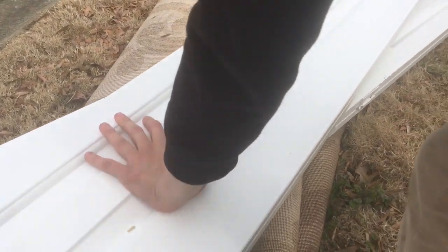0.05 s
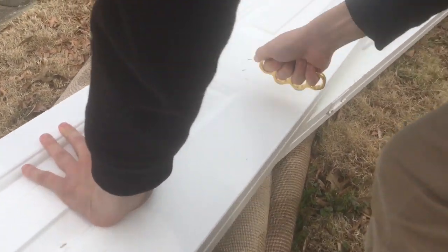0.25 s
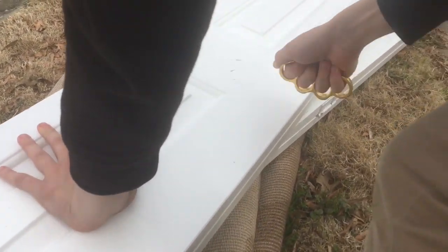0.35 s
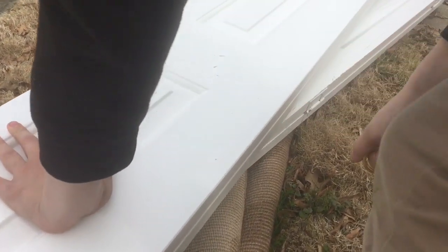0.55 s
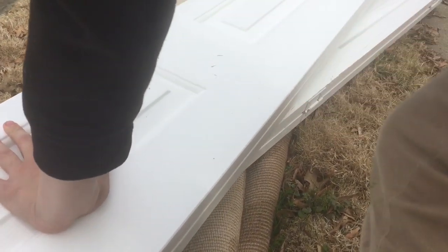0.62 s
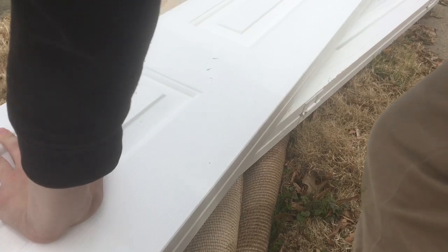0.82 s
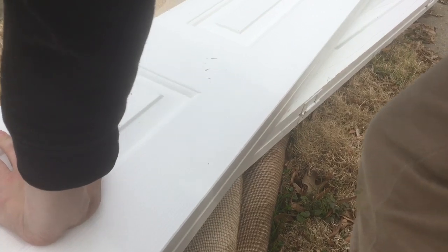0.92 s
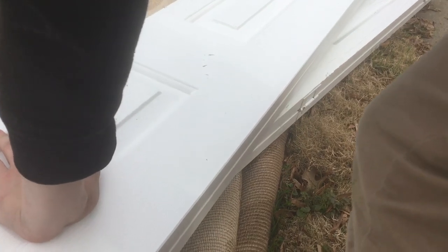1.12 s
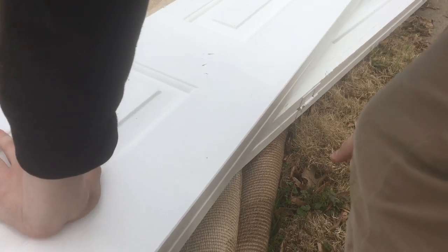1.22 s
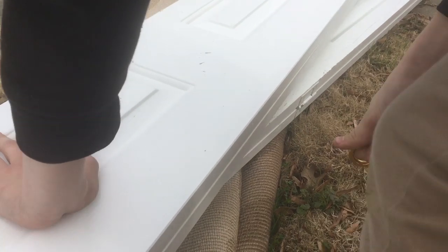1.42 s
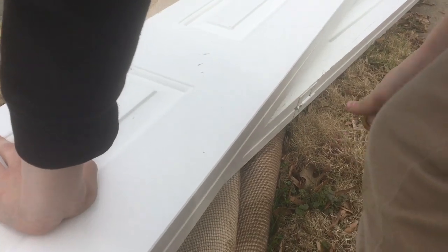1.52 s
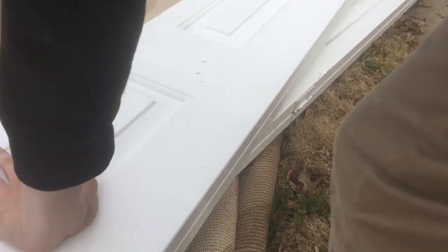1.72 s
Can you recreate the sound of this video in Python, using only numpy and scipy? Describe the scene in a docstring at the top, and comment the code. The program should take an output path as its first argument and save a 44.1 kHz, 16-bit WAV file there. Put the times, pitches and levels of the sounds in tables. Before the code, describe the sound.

A fist in metal knuckles whacks a wooden door outdoors, followed by faint knocks.

```python
"""Metal knuckles on a wooden door

Outdoors, a sleeve swishes and a fist in metal knuckles whacks a door lying on other doors.
The metal cracks on the panel; the door booms, chatters on the stack and overloads the microphone.
Later come a few light knocks and a short squeak of sliding metal, over a quiet yard with a distant hum."""
import sys
import numpy as np
from scipy import signal
from scipy.fft import rfft, irfft
from scipy.io import wavfile
from scipy.ndimage import uniform_filter1d

SR = 44100
rng = np.random.default_rng(int(sys.argv[2]) if len(sys.argv) > 2 else 0)


def to_wav(s):
    """Save 16-bit WAV."""
    ch = np.atleast_2d(s).T  # columns
    pcm = np.round(np.clip(ch, -1, 1) * 32767)  # PCM
    wavfile.write(sys.argv[1], SR, pcm.astype(np.int16))


N = 77175
TIME = np.arange(N) / SR

# contacts on the door: t/s, level/dB, dull above f/Hz, thin below f/Hz, ring time factor,
# boom of the struck spot f/Hz, boom boost/dB
BLOWS = [(0.2295, -10, 9200, 69, 0.76, 300, -0.5), (0.2391, -9.5, 3000, 132, .75, 487, 3.5),
         (0.2564, -24.5, 2464, 197.8, .55, 302.3, 2), (0.2765, -17.5, 3500, 878, 0.49, 600, 4.5),
         (0.2873, -27.5, 3500, 500, 0.54, 600, -7), (0.364, -41, 5100, 914, 0.43, 910, 6),
         (0.388, -51.5, 8690, 900, 0.38, 300, 5), (1.339, -47, 1280, 400, .45, 560, 13.5),
         (1.529, -28, 2220, 168, 0.59, 629, 11), (1.5559, -39, 7000, 1210, .6, 614, 4),
         (1.582, -39.5, 890, 250, 0.75, 340, 7.5), (1.634, -51, 714, 300, .7, 450, 7),
         (1.7, -48, 598, 366, 0.42, 399, 4), (1.7087, -28, 2120, 542, 0.29, 590, 12),
         (1.7256, -42.5, 800, 150, 0.8, 564, 4)]
# the door's strong modes: f/Hz, relative level/dB, t60/s before a blow's ring time factor
DOOR_MODES = [(76, -12, .3), (128, -16, .2), (151, -13, .22), (181, -3, .24), (219, -2, .2), (275, 0, .18),
              (308, -4, .17), (355, -3, .18), (388, -5, .16), (479, -2, .16), (507, -2, .17),
              (555, -8, .16), (630, -12, .2), (659, -8, .18), (763, -10, .17), (999, -11, .17),
              (1055, -9, .18), (1228, -7, .16), (1286, -10, .17), (1400, -11, .14), (1803, -8, .15),
              (2379, -13, .16)]
# its dense weak modes: f/Hz, level/dB at a spacing of MODE_GAP_HZ, t60/s before that factor
WOOD_GRAIN = [(45, -11.5, 0.13), (150, -9, .25), (300, -7.5, .2), (550, -16, 0.22), (850, -19, 0.19),
              (1200, -19, .17), (2160, -26, 0.12), (3500, -30.5, .16), (6500, -42, .17), (14700, -36, .16)]
DOOR_MODES_DB, MODE_GAP_HZ, BOOM_WIDTH_HZ = -5.5, 21, 100
# soft thuds of the hand and heaves of the stack: t/s, level/dB, f/Hz, t60/s
THUMPS = [(0.2325, -2, 190, 0.041), (0.242, -22, 76, .15), (0.27, -22, 66, .16), (0.528, -38, 228, .14),
          (1.336, -36, 420, .06), (1.535, -23, 133.3, .07), (1.553, -26.5, 60, 0.16),
          (1.584, -30, 330, .07), (1.712, -31, 225, .07)]
THUMP_RISE_S, BUILD_CYCLES = .0035, .66

# metal biting the wood: t/s, level/dB, t60/s, tilt/(dB per octave)
CRACKS = [(0.2293, -8, 0.013, 0.5), (0.2305, -12, 0.0088, 3), (0.2322, -16.5, 0.011, -2),
          (0.2505, -22.5, 0.023, 2), (0.2768, -20.5, .01, -7.5), (0.2885, -37, .01, 1.5),
          (1.5295, -35, 0.01, -7), (1.5555, -42, .02, -6), (1.709, -40, .025, -12)]
# tone of a crack before its tilt: f/Hz, relative level/dB
CRACK_COLOUR = [(200, -12.5), (1000, 1), (2500, 8.5), (4200, -4), (6000, 2.5), (8000, -8.5), (10500, -9),
                (12500, -4), (16000, -4.5)]
# pings of the knuckles: t/s, level/dB
PINGS = [(0.2385, -50), (0.251, -50)]
# modes of the knuckles: f/Hz, relative level/dB, t60/s
METAL_MODES = [(5300, -7, .24), (6880, 6, .05), (9250, 9, .04), (10860, -4, .25), (13200, -8, .2)]
# partials of the squeak: f/Hz, relative level/dB, glide as a share of f
SQUEAK_PARTIALS = [(2085, -4, .04), (5230, 0, .025), (10880, -8, -.012)]
SQUEAK_START_S, SQUEAK_LENGTH_S, SQUEAK_DB = 1.534, .076, -52
# small dry ticks: t/s, level/dB, t60/s, tilt/(dB per octave)
TICKS = [(0.1095, -36.5, 0.013, 0), (0.1255, -57, 0.024, -3.5), (0.134, -41, 0.014, -10),
         (0.145, -42, .03, 4), (0.196, -39, .022, -0.5), (0.207, -32, .015, -4), (0.218, -43, 0.018, 4),
         (0.3275, -48, 0.012, -2.5), (0.3562, -50.5, 0.01, 0), (0.463, -56, .04, -7), (0.525, -55, .05, -9),
         (0.541, -38, 0.0081, -1.5), (0.609, -59, .04, -9), (1.1105, -40, 0.0068, 2.5),
         (1.331, -37, 0.01, 9), (1.416, -53.5, 0.022, -4), (1.6275, -47, 0.017, -1)]
# tone of a tick before its tilt: f/Hz, relative level/dB
TICK_COLOUR = [(500, -26.5), (2500, -11.5), (6000, -9.5), (9000, -10), (14000, -2), (16000, -3)]

# swish of the sleeve: t/s, level/dB
SLEEVE_FADER = [(0, -62), (.07, -59.5), (.125, -50.5), (.18, -51), (.215, -48), (.25, -59), (.35, -68.5),
                (.5, -66.5), (.8, -73.5), (1.05, -71), (1.28, -64), (1.4, -59.5), (1.46, -68), (1.61, -63),
                (1.75, -69)]
# tone of rubbing cloth: f/Hz, relative level/dB
SLEEVE_COLOUR = [(300, -5), (1500, -7), (4500, -10), (7000, -5), (10000, -3.5), (12500, -1), (16000, 0.5)]
GRAINS_PER_S, GRAIN_SPREAD_DB, GRAIN_SHARE = 2700, 5, .66
# shuffle of the body: t/s, level/dB
SHUFFLE_FADER = [(0, -56.5), (.1, -59), (.15, -52), (.175, -39.5), (.225, -36.5), (.3, -46.5), (.42, -58),
                 (.53, -54), (.66, -65.5), (1.25, -69), (1.41, -54), (1.47, -69.5), (1.75, -69.5)]
# its dull tone: f/Hz, relative level/dB
SHUFFLE_COLOUR = [(60, -3.5), (200, 4), (400, 0), (800, -9), (1500, -12.5), (2800, -18), (5000, -26.5),
                  (16000, -46)]

# tone of the echo tail: f/Hz, relative level/dB
ECHO_COLOUR = [(20, -45), (110, -28.5), (180, -6.5), (280, -3.5), (390, -3), (500, -22), (1300, -25),
               (2500, -10.5), (5000, -18), (15000, -29.5)]
ECHO_DB, ECHO_T60_S, ECHO_RISE_S = -35.5, .9, .08
# tone of the outdoor air: f/Hz, relative level/dB
AIR_COLOUR = [(25, -11.5), (55, -1.5), (90, -8), (170, -4), (280, -7), (450, -23), (700, -22), (1050, -20),
              (1700, -34), (2800, -39.5), (5000, -47), (16000, -43)]
# partials of the distant hum: f/Hz, level/dB before the yard fader
HUM_PARTIALS = [(119, -55.5), (238, -64), (359, -72.5)]
AIR_DB, HUM_WAVER_HZ = -52.5, 3.4
# ride on air and hum, dipping after the punch: t/s, gain/dB
YARD_FADER = [(0, -1), (.22, 1), (.36, -10.5), (.55, -6.5), (.8, -2), (1.3, 0.5), (1.75, 0.5)]
# rumble on the microphone: t/s, level/dB
RUMBLE_FADER = [(0, -36.5), (.06, -51.5), (.16, -46.5), (.3, -60.5), (.42, -66), (.65, -58), (1.2, -56),
                (1.42, -46), (1.5, -52.5), (1.75, -47)]
# its deep tone: f/Hz, relative level/dB
RUMBLE_COLOUR = [(15, -13), (35, -8), (65, 2), (100, -10.5), (200, -37), (1000, -83)]
DRIVE_DB, KNEE, HIGH_CUT_HZ = 2, 4, 15950


def door():
    """The punch, the chatter and the later knocks, with thuds of hand and stack for weight."""
    out = np.zeros(N)
    for start, *contact in BLOWS:
        add(out, start, blow(*contact))
    for start, db, hz, t60 in THUMPS:
        envelope = amp(db - 60 * TIME / t60) * (1 - np.exp(-TIME / THUMP_RISE_S))
        add(out, start, envelope * np.sin(2 * np.pi * hz * TIME))
    return out


def blow(db, dull_hz, thin_hz, ring_factor, boom_hz, boom_db):
    """One contact rings the door; its hardness and place set which modes answer."""
    def excitation(hz):
        boost_db = boom_db / (1 + ((hz - boom_hz) / BOOM_WIDTH_HZ) ** 4)
        rolloff = np.sqrt((1 + (hz / dull_hz) ** 4) * (1 + (thin_hz / hz) ** 2))
        return amp(db + boost_db) / rolloff

    hz, mode_db, t60 = np.transpose(DOOR_MODES)
    gain = amp(DOOR_MODES_DB + mode_db) * excitation(hz)
    body = ring(hz, gain, t60 * ring_factor, np.pi * np.arange(len(hz)))  # alternating polarity

    grid_hz = np.geomspace(440, 16400, 300) - 400  # weak modes, sparser towards the top
    gap_hz = np.gradient(grid_hz)
    hz = grid_hz + gap_hz * rng.uniform(-.5, .5, len(grid_hz))
    gain = amp(read(WOOD_GRAIN, hz)) * np.sqrt(gap_hz / MODE_GAP_HZ) * excitation(hz)
    t60 = read(WOOD_GRAIN, hz, column=2)
    return body + ring(hz, gain, t60 * ring_factor, rng.uniform(0, 2 * np.pi, len(hz)))


def snaps(events, spectrum):
    """Cracks or ticks: noise bursts with a hard attack and a fast decay, each with its own brightness."""
    out = np.zeros(N)
    t = TIME[:4096]
    for start, db, t60, tilt in events:
        tilted = [(hz, band_db + tilt * np.log2(hz)) for hz, band_db in spectrum]
        burst = colour(rng.choice([-1., 1.], len(t)), tilted)
        add(out, start, burst * amp(db - 60 * t / t60))
    return out


def knuckles():
    """The metal pings briefly, damped by the fingers."""
    out = np.zeros(N)
    hz, mode_db, t60 = np.transpose(METAL_MODES)
    for start, db in PINGS:
        add(out, start, ring(hz, amp(db + mode_db), t60, phase=0))
    return out


def squeak():
    """A few thin, gliding partials swell and fade as metal slides."""
    out = np.zeros(N)
    progress = np.arange(0, 1, 1 / (SQUEAK_LENGTH_S * SR))
    swell = np.sin(np.pi * progress ** .7) ** 2
    for hz, db, glide in SQUEAK_PARTIALS:
        cycles = np.cumsum(hz * (1 + glide * progress)) / SR
        add(out, SQUEAK_START_S, amp(SQUEAK_DB + db) * swell * np.sin(2 * np.pi * cycles))
    return out


def clothes():
    """Sleeve fibres catch and slip in tiny grains over the duller shuffle of the body."""
    grain_db = GRAIN_SPREAD_DB * np.minimum(rng.exponential(1, N), 4)
    sizes = amp(grain_db) * rng.choice([-1, 1], N)
    grains = unit(sizes * (rng.random(N) < GRAINS_PER_S / SR))
    friction = GRAIN_SHARE * grains + (1 - GRAIN_SHARE) * rng.standard_normal(N)
    sleeve = colour(friction, SLEEVE_COLOUR) * fader(SLEEVE_FADER)
    return sleeve + noise(SHUFFLE_COLOUR) * fader(SHUFFLE_FADER)


def echo(hits):
    """The surroundings scatter the hits back as a faint, soft-edged tail."""
    fade_in = 1 - np.exp(-(TIME / ECHO_RISE_S) ** 2)
    tail = noise(ECHO_COLOUR) * fade_in * amp(-60 * TIME / ECHO_T60_S)
    wet = signal.fftconvolve(hits, tail)[:N]
    return amp(ECHO_DB) * np.std(hits) * unit(wet)


def yard():
    """The ambience bed: quiet outdoor air, a wavering distant hum and rumble on the microphone."""
    waver = unit(uniform_filter1d(uniform_filter1d(rng.standard_normal(N), 2000), 2000))
    fundamental_hz = HUM_PARTIALS[0][0]
    wavering_time = np.cumsum(1 + HUM_WAVER_HZ / fundamental_hz * waver) / SR
    hum = sum(amp(db) * np.sqrt(2) * np.sin(2 * np.pi * (hz * wavering_time + rng.random()))
              for hz, db in HUM_PARTIALS)
    air = amp(AIR_DB) * noise(AIR_COLOUR)
    rumble = noise(RUMBLE_COLOUR) * fader(RUMBLE_FADER)
    return (air + hum) * fader(YARD_FADER) + rumble


def ring(hz, gain, t60, phase):
    """Struck modes: dying sines, each building up over its first cycles."""
    t = np.arange(15000, dtype=np.float32) / SR
    hz, gain, t60, phase = (np.float32(v * np.ones(len(hz)))[:, None] for v in (hz, gain, t60, phase))
    attack = 1 - np.exp(-t * hz / BUILD_CYCLES)
    decay = np.exp(np.maximum(-float(np.log(1000)) * t / t60, -20))
    return (gain * attack * decay * np.sin(2 * np.pi * hz * t + phase)).sum(0)


def amp(db):
    """Decibels to gain."""
    return 10 ** (np.asarray(db) / 20)


def unit(x):
    """Normalises to rms 1."""
    return x / np.sqrt(np.mean(x ** 2) + 1e-20)


def read(points, hz, column=1):
    """Reads one column of a table along log frequency."""
    table = np.array(points)
    return np.interp(np.log(hz + 1), np.log(table[:, 0] + 1), table[:, column])


def fader(points):
    """Gain over time from a dB curve."""
    return amp(np.interp(TIME, *np.transpose(points)))


def colour(x, points):
    """Applies an EQ curve and normalises to rms 1."""
    hz = np.fft.rfftfreq(len(x), 1 / SR)
    return unit(irfft(rfft(x) * amp(read(points, hz)), len(x)))


def noise(points):
    """White noise through an EQ curve, at rms 1."""
    return colour(rng.standard_normal(N), points)


def add(mix, start, sound):
    """Drops a sound into the mix at a time in seconds."""
    part = mix[round(start * SR):][:len(sound)]
    part += sound[:len(part)]


def scene():
    """Mono mix: the hits and their echo up front, then squeak, ticks, clothes and the yard."""
    hits = door() + snaps(CRACKS, CRACK_COLOUR) + knuckles()
    return (hits + echo(hits) + squeak() + snaps(TICKS, TICK_COLOUR) + clothes() + yard())[None]


def record(dry):
    """The overloaded microphone rounds off the loudest peaks; a high cut trims the very top."""
    driven = dry * amp(DRIVE_DB)
    clipped = driven / (1 + abs(driven) ** KNEE) ** (1 / KNEE)
    high_cut = signal.firwin(301, HIGH_CUT_HZ, window=("kaiser", 8), fs=SR)
    return signal.oaconvolve(clipped, high_cut[None], "same")


dry = scene()
out = record(dry)
to_wav(out)
```